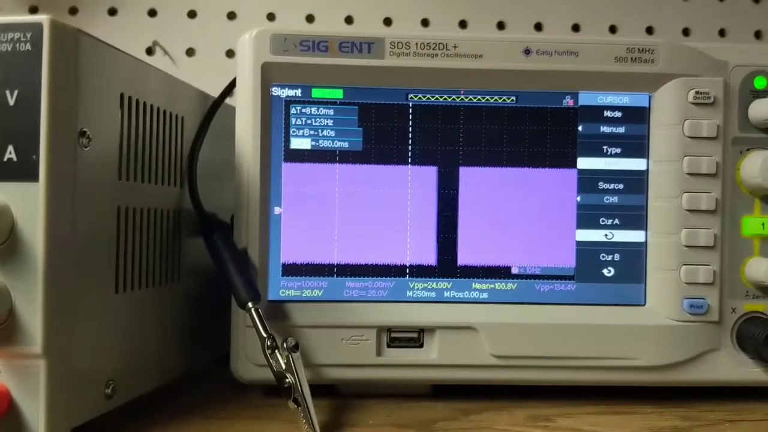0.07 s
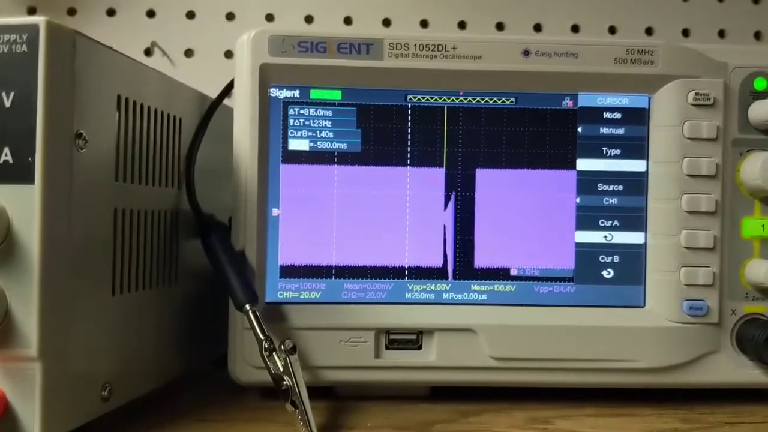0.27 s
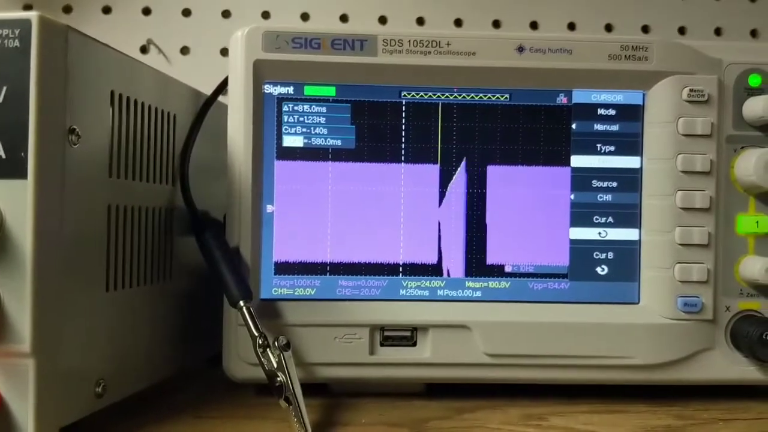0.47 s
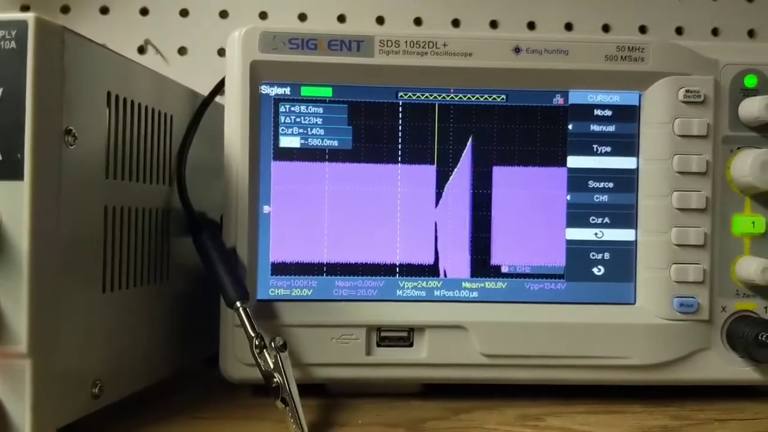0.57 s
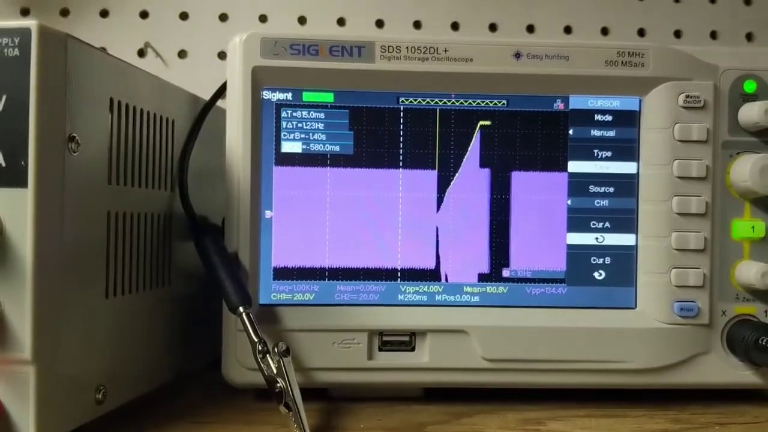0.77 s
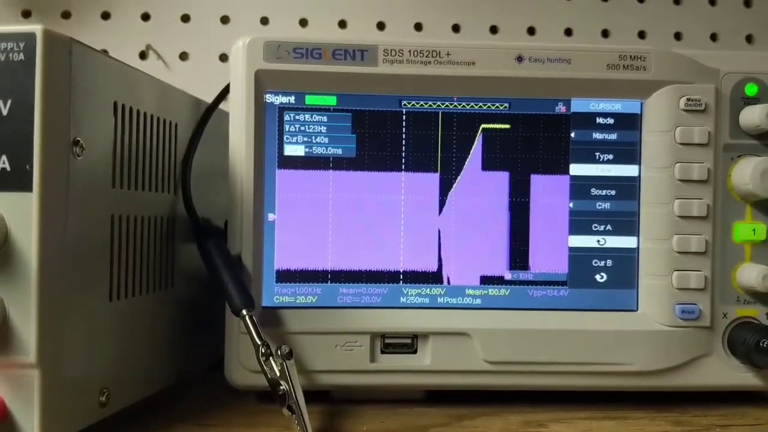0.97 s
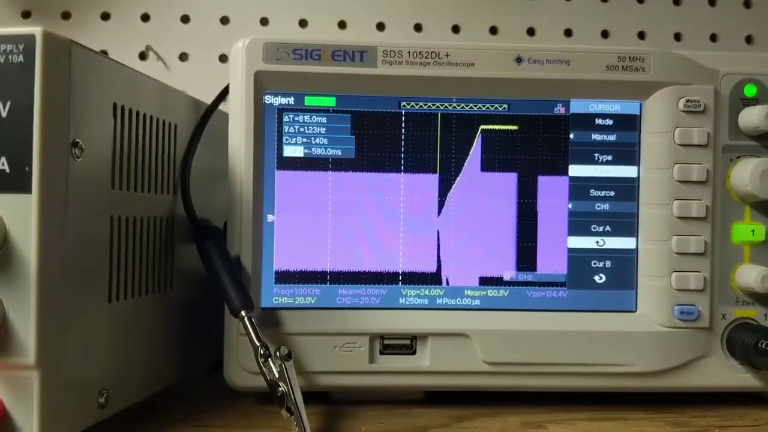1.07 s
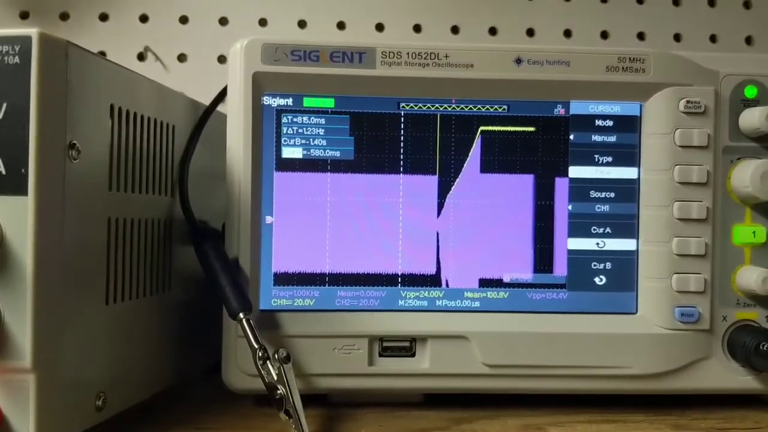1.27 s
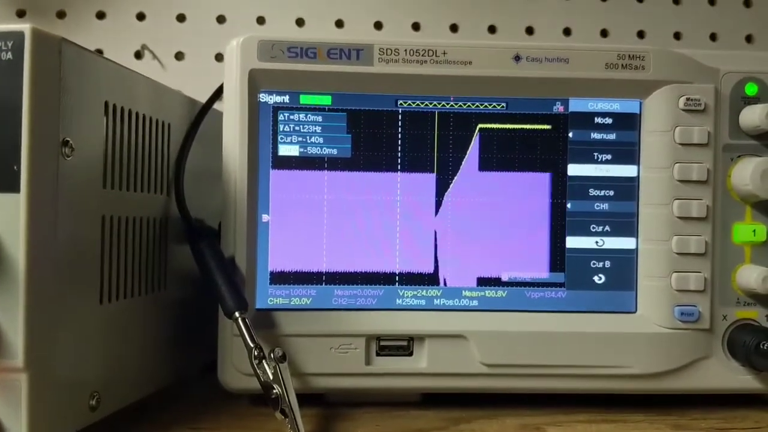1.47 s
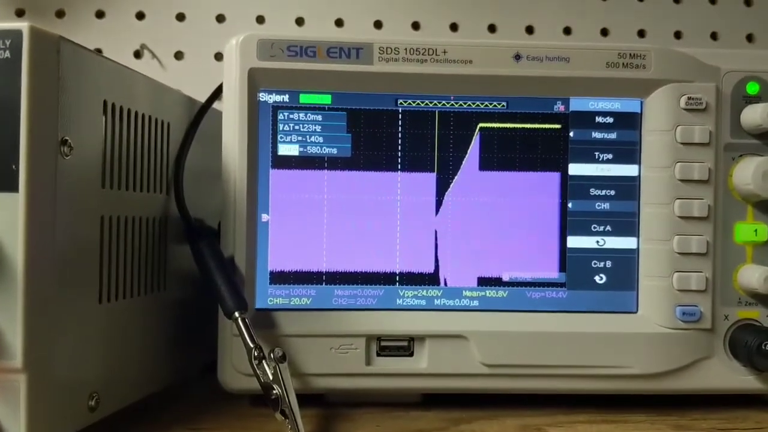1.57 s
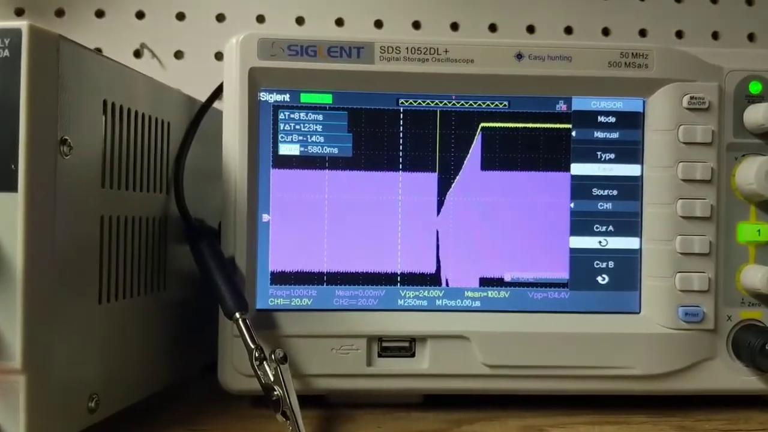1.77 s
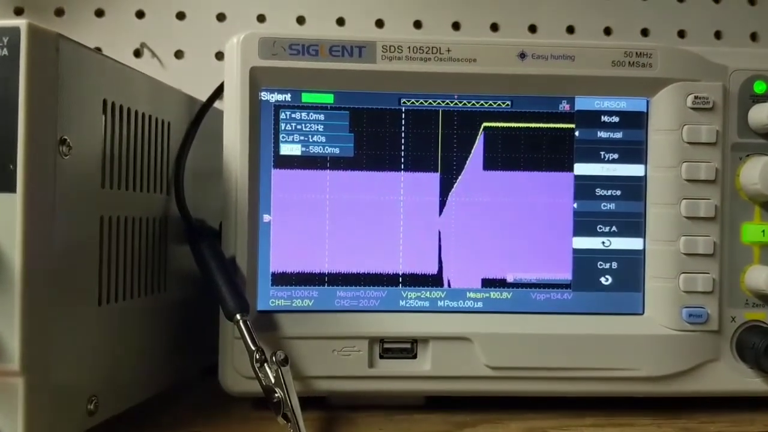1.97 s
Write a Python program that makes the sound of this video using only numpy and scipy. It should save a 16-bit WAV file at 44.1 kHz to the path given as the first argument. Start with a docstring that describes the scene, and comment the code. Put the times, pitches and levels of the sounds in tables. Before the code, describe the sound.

One sharp, bright spark crack with a low double thump comes almost at once, rings briefly off nearby hard surfaces, then only the low fan rush and throbbing hum of bench equipment remain, heard close up.

```python
"""A charged capacitor is shorted on a workbench: one spark cracks, with a low double thump, and the room answers.
The crack is a single click plus a short sizzle of noise, shaped in tone, with ringing metal contacts.
The thump is two smooth pushes and a boom; the echoes are fading noise.
Bench equipment hums throughout: filtered noise makes the fan and the rumble, sine waves the drone and thin tones.
A faint high whine flares now and then. The close microphone rings near 9 kHz, which gives the snap its bright edge."""
import sys
import numpy as np
from scipy import signal
from scipy.fft import rfft, irfft, next_fast_len
from scipy.io import wavfile
from scipy.ndimage import map_coordinates

SR = 44100
rng = np.random.default_rng(int(sys.argv[2]) if len(sys.argv) > 2 else 0)


def int16_out(signal):
    """Quantize to a 16-bit WAV file."""
    q = np.round(np.clip(np.atleast_2d(signal).T, -1, 1) * 32767)
    wavfile.write(sys.argv[1], SR, q.astype(np.int16))


N = 88993  # length in samples
SNAP_S = 0.2031  # moment of the spark


def amp(db):
    """Decibels as a plain multiplier."""
    return 10 ** (np.asarray(db) / 20)


def unit(x):
    """x scaled to an rms of 1."""
    return x / np.sqrt(np.mean(x ** 2) + 1e-20)


def along(points, hz):
    """Read (f/Hz, value) points at any frequency, on a log axis."""
    f, v = np.transpose(points)
    return np.interp(np.log(hz + 1), np.log(f + 1), v)


def curve(rows):
    """Turn (t/s, value) rows into one value per sample."""
    return np.interp(np.arange(N) / SR, *np.transpose(rows))


def since(s):
    """Seconds passed since time s, zero before it."""
    return np.maximum(np.arange(N) / SR - s, 0)


def wobble(rate):
    """A smooth random curve through `rate` random points a second."""
    knots = rng.standard_normal(int(N * rate / SR) + 4)
    return map_coordinates(knots, [np.arange(N) * rate / SR])


def sine(hz, start=0):
    """A sine of rms 1 whose pitch follows hz; start is in turns."""
    turns = np.cumsum(hz) / SR + start
    return np.sqrt(2) * np.sin(2 * np.pi * turns)


def filtered(x, response):
    """x with each frequency multiplied by response(f)."""
    m = next_fast_len(N + SR // 2)
    return irfft(rfft(x, m) * response(np.fft.rfftfreq(m, 1 / SR)), m)[:N]


def resonance(f, hz, width):
    """Response of something that rings at hz: 1 at the peak, falling off on both sides."""
    return 1j * f * width / (hz * hz - f * f + 1j * f * width)


def coloured(x, spectrum, size=4096):
    """x through a filter of the given (f/Hz, level/dB) shape that never sounds ahead of its input."""
    gain = amp(along(spectrum, np.fft.rfftfreq(size, 1 / SR)))
    # folding the cepstrum puts the filter's energy as early as possible
    cepstrum = irfft(np.log(gain))
    cepstrum[1:size // 2] *= 2
    cepstrum[size // 2 + 1:] = 0
    impulse = irfft(np.exp(rfft(cepstrum)))
    return signal.fftconvolve(x, impulse)[:N]


def burst(noise, t60, rise):
    """Noise that swells and dies after the snap, falling 60 dB in t60 seconds; total energy 1."""
    t = since(SNAP_S)
    y = noise * amp(-60 * t / t60) * (1 - np.exp(-t / rise))
    return y / np.linalg.norm(y)


# tone of the fan's rush: f/Hz, relative level/dB
FAN_COLOUR = [(30, -12.5), (110, 7), (170, -2), (240, 2.5), (290, -0.5), (370, 1.5), (470, -2.5), (620, -5),
              (850, -7), (1100, -9), (2000, -15), (3000, -25), (6000, -52.5)]
# loudness of the rush over time: t/s, level/dB
FAN_LEVEL = [(0, -51), (.19, -51.5), (.26, -56.5), (.36, -51), (.6, -50), (.95, -51.5), (1.52, -50),
             (2, -52)]
# tone of the steady hiss: f/Hz, relative level/dB
HISS_COLOUR = [(500, -20.5), (2000, 2), (3200, 0), (5000, -3), (7500, -11.5), (9000, -18), (11500, -16),
               (15500, -16.5)]
HISS_DB = -65.5


def fan():
    """Air rushing through the fan is shaped noise of changing level, with a steady hiss above it."""
    def noise(spectrum):
        return unit(filtered(rng.standard_normal(N), lambda f: amp(along(spectrum, f))))

    rush = amp(curve(FAN_LEVEL)) * noise(FAN_COLOUR)
    hiss = amp(HISS_DB) * noise(HISS_COLOUR)
    return rush + hiss


# resonances of the rumble: f/Hz, half-width/Hz, relative level/dB
RUMBLE_PEAKS = [(71.6, 9.1, 2.5), (93.76, 9.3, 1.5), (46, 9, -5.5), (142, 16, -13.5)]
# loudness of the rumble: t/s, level/dB
RUMBLE_LEVEL = [(0, -49.5), (.27, -51.5), (.4, -46), (.72, -50), (.85, -48.5), (1.2, -49), (1.42, -53),
                (1.65, -41), (1.8, -47), (2.02, -46.5)]
# swells and fades of the low tone: t/s, level/dB
DRONE_LEVEL = [(.04, -42.5), (.1, -59), (.18, -43), (.28, -58), (.37, -42), (.5, -56), (.63, -45),
               (.74, -54), (.95, -52), (1.13, -41.5), (1.19, -51), (1.28, -37.5), (1.4, -60), (1.5, -42),
               (1.62, -50.5), (1.8, -55), (1.92, -43.5), (2.02, -46)]
DRONE_HZ, DRONE_WANDER_HZ = 70.25, 2.46  # centre pitch and scale of its random drift


def drone():
    """A low tone of wandering pitch throbs over noise narrowed by low resonances."""
    def rumble_shape(f):
        peaks = [amp(db) * abs(resonance(f, hz, 2 * half_width)) ** 2 for hz, half_width, db in RUMBLE_PEAKS]
        return np.sqrt(sum(peak ** 2 for peak in peaks))

    rumble = unit(filtered(rng.standard_normal(N), rumble_shape))
    tone = sine(DRONE_HZ + DRONE_WANDER_HZ * wobble(14))
    return amp(curve(RUMBLE_LEVEL)) * rumble + amp(curve(DRONE_LEVEL)) * tone


# steady tones of the equipment: f/Hz, level/dB (rms, around which it wavers)
TONES = [(236.9, -65), (355.3, -62), (597.5, -69.5), (775.2, -76.5), (1071, -67.5), (1184, -75.5),
         (1367, -70), (1782, -66.5), (1841, -78.5), (2492, -79.5), (6121, -87.5), (6831, -87.5)]
TONE_DRIFT_HZ, TONE_WAVER_DB = 0.6, 1.03  # scale of the random drift in pitch and level


def tones():
    """Each thin tone of the equipment is a sine, slightly unsteady in pitch and level."""
    out = np.zeros(N)
    for hz, db in TONES:
        tone = sine(hz + TONE_DRIFT_HZ * wobble(7.4), start=rng.random())
        out += amp(db + TONE_WAVER_DB * wobble(6)) * tone
    return out


# flares of the faint high whine: t/s (peak), level/dB
FLARES = [(0.83, -84.5), (0.99, -82), (1.05, -85), (1.38, -84.5), (1.749, -76.5)]
FLARE_HZ, FLARE_HALF_WIDTH_HZ = 9160, 410
FLARE_S = 0.0088  # from the peak to 1/e of it


def whine():
    """Noise squeezed into a narrow high band swells briefly at each flare."""
    t = np.arange(N) / SR
    band = lambda f: resonance(f, FLARE_HZ, 2 * FLARE_HALF_WIDTH_HZ) ** 2
    hiss = unit(filtered(rng.standard_normal(N), band))
    swells = sum(amp(db) * np.exp(-((t - s) / FLARE_S) ** 2) for s, db in FLARES)
    return hiss * swells


# tone of reflections from the bench and the instrument cases: f/Hz, level/dB
NEAR_COLOUR = [(150, -9), (600, -0.5), (1500, -0.5), (2500, -5), (3500, -1.5), (5300, 1), (7000, 1.5),
               (8700, 1.5), (10000, 1.5), (12000, -8), (15500, -4.5)]
NEAR_DB, NEAR_T60 = 3.5, 0.067  # dB, s
NEAR_SPIKINESS = 1.4  # above 1, strong reflections stand out more
# tone of the room's tail: f/Hz, level/dB
ROOM_COLOUR = [(150, -5), (700, -21.5), (1400, 2), (2200, -5), (3500, 1.5), (5500, 3), (7500, 0.5),
               (8700, -1.5), (10000, -6), (12000, -7.5), (15500, -7.5)]
# how long the tail takes to fall 60 dB: f/Hz, t60/s
ROOM_T60 = [(200, 0.16), (1500, 0.21), (5000, 0.21), (9000, 0.22), (12000, .19), (15000, .175)]
ROOM_DB, ROOM_BUILD_S = -2.5, 0.0056
# tone of the bright ring that lingers longest: f/Hz, level/dB
LINGER_COLOUR = [(500, -25), (3000, -13), (6000, -12), (8600, 4), (9500, -4.5), (10500, -4.5),
                 (12000, -13.5), (15500, -14)]
LINGER_DB, LINGER_T60 = -13.5, 0.3  # dB, s


def echoes():
    """Spiky reflections from close surfaces, then the room's diffuse tail and a lingering bright ring."""
    noise = rng.standard_normal(N)
    spiky = np.sign(noise) * abs(noise) ** NEAR_SPIKINESS
    near = burst(spiky, NEAR_T60, rise=0.000668)

    # fade each frequency of the tail at its own speed
    hz, t, z = signal.stft(rng.standard_normal(N), SR, nperseg=256)
    fade = amp(-60 * np.maximum(t - SNAP_S, 0) / along(ROOM_T60, hz)[:, None])
    tail = signal.istft(z * fade, SR, nperseg=256)[1][:N]
    tail = tail * (1 - np.exp(-since(SNAP_S) / ROOM_BUILD_S))
    tail = tail / np.linalg.norm(tail)

    linger = burst(rng.standard_normal(N), LINGER_T60, rise=ROOM_BUILD_S)
    return (amp(NEAR_DB) * coloured(near, NEAR_COLOUR)
            + amp(ROOM_DB) * coloured(tail, ROOM_COLOUR)
            + amp(LINGER_DB) * coloured(linger, LINGER_COLOUR))


# low pressure pushes of the discharge: t/s, signed height (before rise and fall), decay/s
PUSHES = [(0.2032, -0.28, 0.00076), (0.20562, 0.46, 0.00095)]
PUSH_RISE_S = 0.00014
BOOM_HZ, BOOM_DB, BOOM_T60, BOOM_DELAY_S = 64.95, -20, 0.062, 0.0051  # the bench top


def thump():
    """The discharge pushes the air twice, in opposite directions, and the bench top answers with a short boom."""
    pushes = np.zeros(N)
    for s, height, decay in PUSHES:
        t = since(s)
        pushes += height * (1 - np.exp(-t / PUSH_RISE_S)) * np.exp(-t / decay)
    t = since(SNAP_S + BOOM_DELAY_S)
    boom = amp(BOOM_DB - 60 * t / BOOM_T60) * np.sin(2 * np.pi * BOOM_HZ * t)
    return pushes - boom


# tone of the spark's crack: f/Hz, level/dB
CRACK_COLOUR = [(100, -16.5), (700, -5), (1400, -3.5), (2300, -8), (3300, 10.5), (4500, -2), (6000, -3.5),
                (9000, 1.5), (12000, -11.5), (15500, -8)]
CRACK_DB = -4  # the click, before its tone is shaped
SIZZLE_DB, SIZZLE_T60 = -2.5, 0.003  # the arc dying out: dB before shaping, s
# ringing of the metal contact: f/Hz, level/dB (at the start), t60/s
CONTACT = [(8360, -15.5, 0.0072), (8940, -35.5, 0.06), (8220, -43.5, 0.051), (9150, -37.5, 0.078),
           (4970, -37, 0.12)]


def spark():
    """The spark sends out one shock front, sizzles as the arc dies and makes the metal contact ring."""
    front = np.zeros(N)
    front[round(SNAP_S * SR)] = amp(CRACK_DB)
    sizzle = amp(SIZZLE_DB) * burst(rng.standard_normal(N), SIZZLE_T60, rise=0.0001)
    t = since(SNAP_S)
    ring = sum(amp(db - 60 * t / t60) * np.sin(2 * np.pi * hz * t) for hz, db, t60 in CONTACT)
    return coloured(front + sizzle, CRACK_COLOUR) + ring


def scene():
    """The snap over the hum of the bench, as one channel."""
    background = fan() + drone() + tones() + whine()
    snap = echoes() + thump() + spark()
    return (background + snap)[None]


PORT_HZ, PORT_WIDTH_HZ, PORT_DB = 8950, 900, 7.5  # microphone resonance, acting on everything it picks up
LOW_CUT_HZ, TOP_HZ = 20, 15800


def record(dry):
    """The microphone rings in the treble, loses the deepest bass and passes nothing far above TOP_HZ."""
    def microphone(f):
        port = 1 + amp(PORT_DB) * resonance(f, PORT_HZ, PORT_WIDTH_HZ)
        band = np.clip((TOP_HZ - f) / 500 + 0.5, 0, 1)  # slopes to silence over 500 Hz
        return port * band

    low_cut = signal.butter(2, LOW_CUT_HZ, "high", fs=SR, output="sos")
    return signal.sosfilt(low_cut, filtered(dry[0], microphone))[None]


dry = scene()
out = record(dry)
int16_out(out)
```